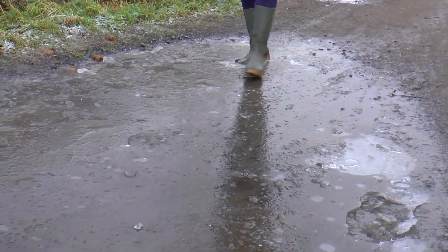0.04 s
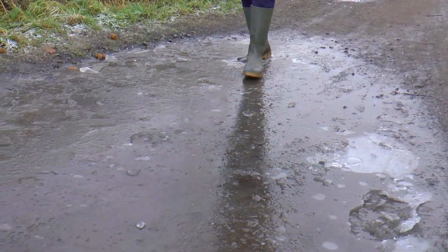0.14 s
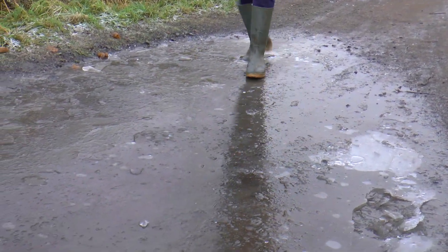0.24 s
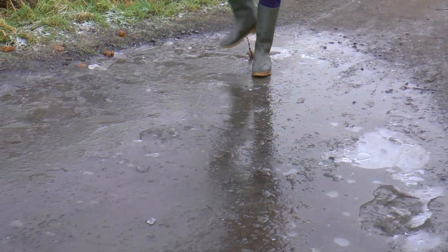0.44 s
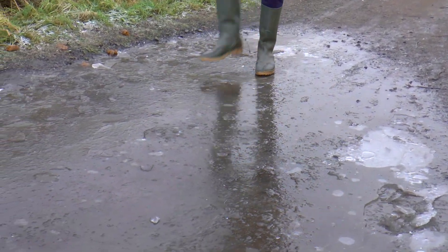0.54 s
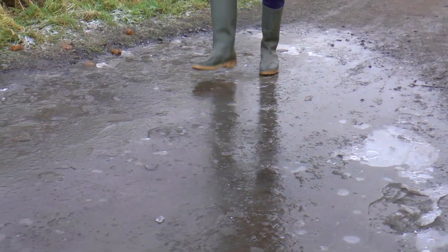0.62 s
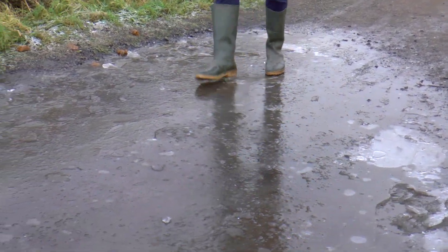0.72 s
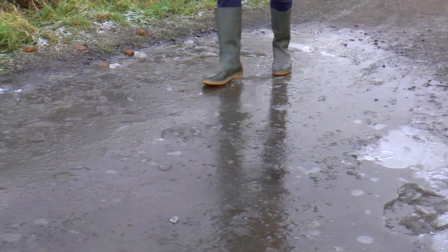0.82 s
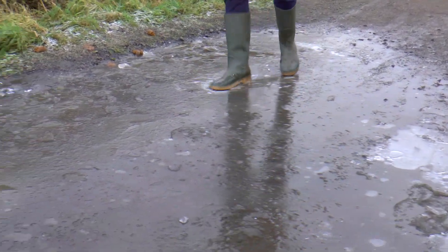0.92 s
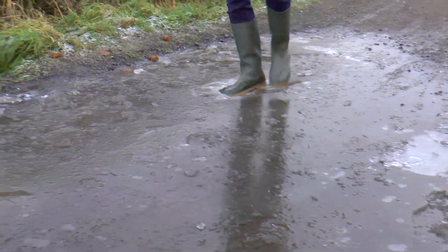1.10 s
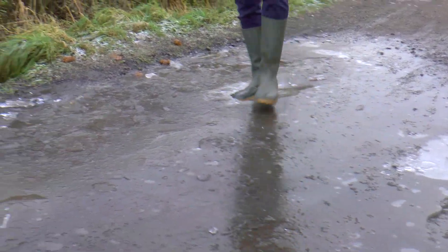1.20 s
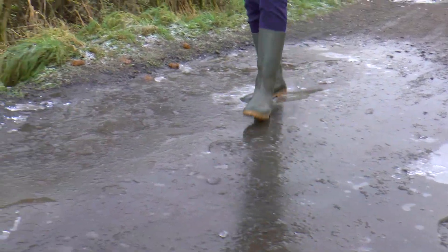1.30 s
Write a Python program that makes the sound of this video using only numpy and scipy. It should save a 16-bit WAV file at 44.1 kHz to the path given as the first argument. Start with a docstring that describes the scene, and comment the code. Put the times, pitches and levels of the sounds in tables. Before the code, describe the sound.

Sharp, brittle crackles of ice come from two boot steps in a slushy puddle on an open track, slightly left of the microphone. Broken pieces knock, then water drips, with soft open air and a low hum behind.

```python
"""Thin ice cracks and crunches: rubber boots take two steps through a puddle on an open track,
a few metres from the microphone and a little to its left. Each crack sends a bending wave through
the sheet that outruns the sound in air, so a ring near 4 kHz swells and ends in a click.
Under the soles the ice crumbles, plates knock and slush churns; water drips as the boot lifts.
Open air and a low drone lie behind."""
import sys
import numpy as np
from scipy import signal
from scipy.fft import rfft, irfft, next_fast_len
from scipy.io import wavfile
from scipy.ndimage import map_coordinates

SR = 44100
rng = np.random.default_rng(int(sys.argv[2]) if len(sys.argv) > 2 else 0)


def log_audio(samples):
    """Write samples as a 16-bit WAV file to the path given in sys.argv[1]."""
    # one column per channel
    frames = np.atleast_2d(samples).T
    # limit to full scale, then quantise
    limited = np.clip(frames, -1, 1)
    pcm = np.round(limited * 32767).astype(np.int16)
    wavfile.write(sys.argv[1], SR, pcm)


N = 59535  # 1.35 s

# spectrum of the ringing ice sheet (f/Hz, level/dB)
SHEET_SPECTRUM = [(200, -19), (700, -28), (1400, -13), (2300, -8), (3100, -2), (4000, 0), (4700, -6.5),
                  (5600, -9), (7500, -18), (10000, -30)]


def cracks(lead_s=0.008, click_trim_db=-1.5, click_decay_s=0.00083, edge_db=-9.5, edge_decay_s=0.0024):
    """The ring arrives through the ice, then the click through the air; the broken edge rattles on."""
    # cracks in the sheet (t/s, ring level/dB, ring f/Hz, relative click level/dB)
    fractures = [(0.1859, -28, 3300, -27), (.2110, -17, 3730, -28), (0.2125, -26, 3700, -33),
                 (.2175, -18.5, 3730, -44), (.2630, -26, 3500, -43), (0.267, -22, 3300, -37),
                 (.2828, -15.5, 3300, -25.5), (0.286, -21, 3370, -24), (0.3106, -8, 3620, -42),
                 (0.3137, -15, 3430, -42), (0.3181, -18, 3170, -37), (0.3215, -15.5, 3400, -36),
                 (0.335, -20, 3900, -39), (0.3465, -13, 3900, -40), (0.3604, -7, 3820, -20),
                 (0.3628, -11.5, 2910, -23), (0.3638, -9.5, 4900, -19), (0.379, -42, 5340, -25),
                 (0.397, -12, 4160, -33), (0.4028, -15.5, 3660, -41), (0.4077, -13, 3600, -44),
                 (.4110, -15.5, 3800, -41), (0.4182, -22, 3700, -43), (0.4279, -9.5, 3640, -17),
                 (.4490, -17, 3940, -27), (0.4534, -18.5, 3320, -24), (.4670, -13, 3880, -39),
                 (0.493, -13, 4050, -26), (0.4992, -7, 3880, -30), (.5590, -17.5, 3160, -27),
                 (0.5739, -7, 3930, -42), (0.6312, -15.5, 3750, -27.5), (0.6542, -17.5, 3640, -34),
                 (0.6756, -26, 4200, -23.5), (0.6946, -17, 4070, -26), (0.725, -27, 3800, -28),
                 (.7310, -19, 3830, -34), (0.7588, -11.5, 4090, -24.5), (0.7844, -12.5, 4170, -24),
                 (0.8112, -19, 3970, -33), (0.836, -10.5, 4200, -41), (0.8462, -11.5, 3860, -30),
                 (0.8662, -17, 3820, -27), (0.904, -16, 4300, -30), (0.9203, -6.5, 4110, -33),
                 (0.9242, -8, 4170, -37), (0.9258, -15, 4130, -26), (0.9418, -13, 2530, -19.5),
                 (0.9568, -18, 3900, -33), (0.9655, -9, 4200, -36), (.9725, -19, 4400, -26),
                 (0.9803, -30, 3270, -29), (0.9923, -12, 4070, -37), (0.996, -14, 4470, -24),
                 (1.0110, -24, 3360, -21), (1.0173, -26, 3770, -21.5), (1.1329, -22.5, 3200, -26),
                 (1.1600, -32, 3900, -41), (1.2183, -25, 4160, -49), (1.3122, -29, 4100, -38)]
    # spectrum of the airborne click (f/Hz, level/dB)
    click_spectrum = [(150, 1.5), (600, -10.5), (1500, -6.5), (2500, -12), (6000, 3.5), (8000, -0.5),
                      (10000, -12.5), (12500, -1), (16000, -10)]
    times, ring_db, hz, click_db = np.transpose(fractures)[..., None]
    t = np.arange(SR // 20) / SR - lead_s  # zero at the click
    broken = t >= 0
    age = np.maximum(t, 0)
    ring = amp(ring_db) * bending_wave(t, hz, rng.random(times.shape))
    click = amp(click_db + click_trim_db) * np.exp(-age / click_decay_s) * rng.standard_normal(ring.shape)
    edge = amp(ring_db + edge_db) * broken * np.exp(-age / edge_decay_s) * rng.standard_normal(ring.shape)
    clicks = colour(place(times, click[:, broken]), click_spectrum)
    edges = colour(place(times - lead_s, edge), SHEET_SPECTRUM)
    return place(times - lead_s, ring) + 2 * (clicks + edges)


def bending_wave(t, hz, phase, swell_s=0.00093, stop_s=0.00021, roughness=0.15):
    """A wave scattered by the uneven sheet: it swells until t = 0, then stops quickly."""
    wander = roughness * np.cumsum(rng.standard_normal((len(hz), len(t))), axis=1)
    envelope = np.exp(np.minimum(t / swell_s, -t / stop_s))
    return envelope * np.sin(2 * np.pi * (hz * t + phase) + wander)


def crush(splinter_trim_db=2, spray_gain=0.96):
    """Crackle, churning slush and fine splinters swell as each boot bears down."""
    # crushing under the boots (t/s, then relative level/dB of crackle, slush and splinters)
    crush_levels = [(0, -72, -64, -72), (.088, -67, -64, -65.5), (0.101, -47, -64, -49.5),
                    (.110, -65, -70, -70), (.166, -70, -66, -75), (.172, -34.5, -37, -56),
                    (0.191, -49, -47, -58), (.202, -53, -52, -56), (.214, -30, -33, -51),
                    (.235, -53, -47, -63), (0.249, -54.5, -67, -67), (0.259, -31, -39, -50),
                    (.275, -42, -42.5, -54), (.306, -38.5, -44.5, -49), (0.314, -33.5, -35, -52),
                    (0.354, -40.5, -47.5, -58), (.366, -35, -36.5, -47), (0.387, -36, -42.5, -52),
                    (0.418, -26.5, -30.5, -37), (0.446, -32.5, -44.5, -43), (.480, -39, -46, -49.5),
                    (.503, -38, -42.5, -45.5), (.547, -37, -49, -55), (.562, -39.5, -41.5, -46.5),
                    (.610, -37.5, -58, -48), (0.659, -43.5, -47.5, -51.5), (0.693, -28.5, -42, -40.5),
                    (0.746, -46.5, -61, -51.5), (0.803, -45, -49.5, -52), (0.826, -30.5, -37.5, -39),
                    (0.858, -29.5, -29, -37), (0.877, -31, -43, -40), (.920, -28.5, -41.5, -40.5),
                    (.965, -28.5, -38.5, -42), (1.015, -31.5, -36.5, -32.5), (1.051, -34.5, -32, -41.5),
                    (1.085, -46, -45.5, -53), (1.140, -53.5, -46.5, -55.5), (1.195, -56, -57, -65),
                    (1.236, -58, -66, -63), (1.246, -42.5, -40, -49), (1.262, -56.5, -59, -64),
                    (1.308, -51, -61, -63), (1.313, -39, -51, -45.5), (1.350, -44, -48.5, -60)]
    # spectrum of the slush (f/Hz, level/dB)
    slush_spectrum = [(70, -3.5), (150, -6), (260, -6), (400, -1.5), (650, -4.5), (1600, -2.5),
                      (2400, -4.5), (4000, -30), (9000, -35)]
    # spectrum of the splinters (f/Hz, level/dB)
    splinter_spectrum = [(1500, -14), (4000, 1), (6200, -4), (8300, 3), (10000, -8.5), (11500, -1.5),
                         (13000, 2.5), (16000, -3.5)]
    times, *levels = np.transpose(crush_levels)
    ice, wet, fine = [amp(np.interp(np.arange(N) / SR, times, db)) for db in levels]
    slush = unit(colour(ticks(decay_s=0.0026, spread_db=5, count=520), slush_spectrum))
    snaps = ticks(decay_s=0.00036, spread_db=4, count=1000)
    spray = spray_gain * rng.standard_normal(N)
    splinters = unit(colour(snaps + spray, splinter_spectrum))
    return ice * crackle() + wet * slush + amp(splinter_trim_db) * fine * splinters


def crackle(ring_hz=4000, pitch_spread=0.12, grit_db=4):
    """Hundreds of small cracks, each with its own pitch, over the grit of grinding shards."""
    starts, size = scatter(spread_db=5.5, count=900)
    t = np.arange(-SR // 200, SR // 400) / SR
    hz = ring_hz * np.exp(pitch_spread * rng.standard_normal(size.shape))
    rings = unit(place(starts, size * bending_wave(t, hz, rng.random(size.shape))))
    grit = unit(colour(ticks(decay_s=0.001, spread_db=3.5, count=1300), SHEET_SPECTRUM))
    return unit(rings + amp(grit_db) * grit)


def knocks(cycles=5.06, attack_s=0.00015, trim_db=3, lowest_hz=190):
    """Plates slap on water and ground, damped within a few cycles and too small to radiate bass."""
    # ice plates knocking under the sole (t/s, relative level/dB, f/Hz)
    plates = [(0.2002, -24, 625), (.2010, -21, 1890), (0.284, -21, 1370), (.3620, -18.5, 520),
              (0.415, -19.5, 1470), (0.4173, -24, 1800), (.6305, -30.5, 460), (.6312, -22.5, 1490),
              (0.829, -22.5, 660), (.8418, -13.5, 1150), (0.844, -28, 510), (0.852, -18.5, 670),
              (.8620, -19.5, 200), (0.8664, -17.5, 1410), (0.9366, -16, 594), (0.9398, -16.5, 1520),
              (0.9448, -25.5, 600), (0.9743, -30, 1000), (1.017, -26.5, 510), (1.0385, -20.5, 716),
              (1.0425, -24, 845), (1.1310, -26.5, 547), (1.1313, -16.5, 2170), (1.2172, -22, 1960),
              (1.243, -33, 540), (1.2470, -35.5, 520)]
    times, db, hz = np.transpose(plates)[..., None]
    t = np.arange(SR // 20) / SR
    envelope = amp(db + trim_db - 60 * t * hz / cycles) * (1 - np.exp(-t / attack_s))
    slaps = place(times, envelope * np.sin(2 * np.pi * hz * t))
    return signal.sosfilt(signal.butter(2, lowest_hz, "highpass", fs=SR, output="sos"), slaps)


def bubbles(attack_s=0.00094, pitch_rise=0.18):
    """Each pocket of air rings and rises in pitch as it dies."""
    # air pockets and drips (t/s, level/dB, starting f/Hz, cycles to fall 60 dB)
    pockets = [(.4155, -22.5, 340, 23), (.4210, -26, 466, 23.5), (0.429, -25, 374, 10),
               (.5120, -25, 1480, 23), (.5770, -32, 380, 17), (1.1325, -27, 2430, 46),
               (1.1795, -25, 1480, 28), (1.2115, -32, 850, 24), (1.2175, -24, 1360, 21),
               (1.2410, -28, 1625, 40), (1.3220, -33.5, 780, 27), (1.334, -40, 1000, 30)]
    times, db, hz, cycles = np.transpose(pockets)[..., None]
    t = np.arange(SR // 10) / SR
    age = t * hz / cycles  # 1 at the end of a bubble's life
    envelope = amp(db - 60 * age) * (1 - np.exp(-t / attack_s))
    return place(times, envelope * np.sin(2 * np.pi * hz * t * (1 + pitch_rise * age / 2)))


def ground_reflections(x, t60_s=0.032, side_db=-12):
    """Ground and verge scatter a brief tail to the microphone, nearly alike in both channels."""
    t = np.arange(SR // 5) / SR
    mid, side = rng.standard_normal((2, len(t))) * amp(-60 * t / t60_s) * (t > 0.001)
    tail = mid + amp(side_db) * np.array([side, -side])
    return signal.fftconvolve(x[None], tail / np.linalg.norm(tail[0]), axes=1)[:, :N]


def background(air_db=-46.5, side_db=-11, drone_hz=59.5, waver_db=3.5, drift_rad=0.28):
    """Open air and a low wavering drone, perhaps a far engine."""
    # spectrum of the open air over the track (f/Hz, level/dB)
    air_spectrum = [(20, -32), (35, -10), (50, 5.5), (90, 3.5), (150, -7.5), (280, -18.5), (500, -13),
                    (900, -8.5), (1600, -19), (3500, -28), (8000, -40.5), (10000, -45), (13000, -37),
                    (16000, -43)]
    # slow rise and fall of the drone (t/s, level/dB)
    drone_levels = [(0, -49.5), (.3, -45.5), (.6, -45.5), (.69, -38.5), (.78, -53), (.85, -41.5),
                    (1.0, -49.5), (1.35, -45)]
    t = np.arange(N) / SR
    mid, side = amp(air_db) * unit(colour(rng.standard_normal((2, N)), air_spectrum))
    drone_db = np.interp(t, *np.transpose(drone_levels)) + waver_db * wobble(12.16)
    drone = np.sqrt(2) * amp(drone_db) * np.sin(2 * np.pi * drone_hz * t + drift_rad * wobble(11))
    return mid + drone + amp(side_db) * np.array([side, -side])


def ticks(decay_s, spread_db, count):
    """A stream of tiny noise bursts of uneven size."""
    starts, size = scatter(spread_db, count)
    t = np.arange(SR // 80) / SR
    return unit(place(starts, size * np.exp(-t / decay_s) * rng.standard_normal((count, len(t)))))


def scatter(spread_db, count):
    """Start times spread loosely over the scene, and a size for each."""
    starts = (np.arange(count)[:, None] + rng.uniform(-1, 1, (count, 1))) / count * N / SR
    return starts, amp(spread_db * np.clip(rng.standard_normal((count, 1)), -2, 2))


def place(starts, waves):
    """Add each row of waves at its start time in seconds."""
    at = np.round(starts * SR).astype(int) + np.arange(waves.shape[1])
    inside = (at >= 0) & (at < N)
    return np.bincount(at[inside], waves[inside], N)


def wobble(rate):
    """A smooth random curve, rate knots a second."""
    return map_coordinates(rng.standard_normal(400), [np.arange(N) * rate / SR + 2], mode="mirror")


def colour(x, points):
    """Shape x by (f/Hz, level/dB) points on a log frequency axis."""
    f, db = np.transpose(points)
    return filtered(x, lambda hz: amp(np.interp(np.log(hz + 1), np.log(f), db)))


def filtered(x, response):
    """Multiply the spectrum of x by response(hz)."""
    size = next_fast_len(N + 8192)
    return irfft(rfft(x, size) * response(np.fft.rfftfreq(size, 1 / SR)), size)[..., :N]


def amp(db):
    """Decibels to gain."""
    return 10 ** (np.asarray(db) / 20)


def unit(x):
    """Scale to rms 1."""
    return x / np.sqrt(np.mean(x ** 2) + 1e-20)


def scene(ground_db=-12.5, left_over_right_db=4.5):
    """The steps and the open track around them, louder on the left of the microphone."""
    steps = cracks() + crush() + knocks() + bubbles()
    balance = amp(np.array([[left_over_right_db], [-left_over_right_db]]) / 2)
    return balance * (steps + amp(ground_db) * ground_reflections(steps) + background())


def record(dry, top_hz=15950):
    """The camera keeps nothing above its band limit."""
    return filtered(dry, lambda hz: hz < top_hz)


dry = scene()
out = record(dry)
log_audio(out)
```